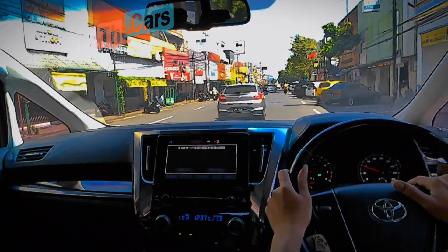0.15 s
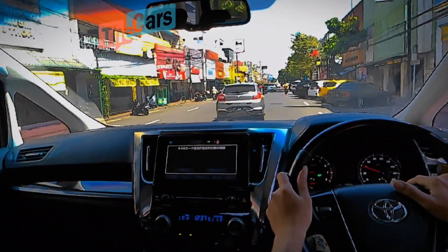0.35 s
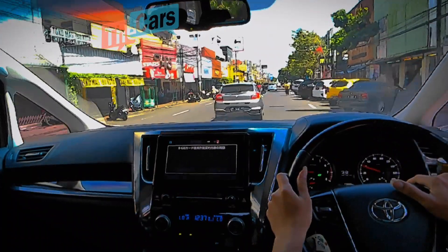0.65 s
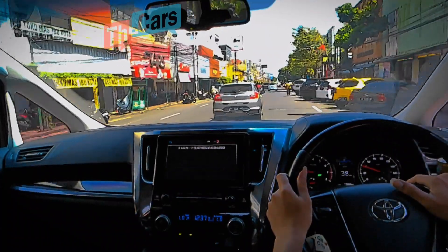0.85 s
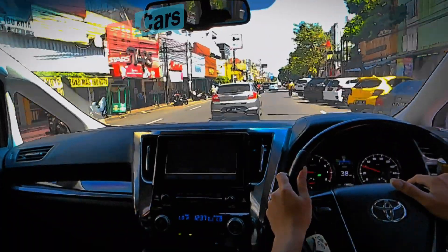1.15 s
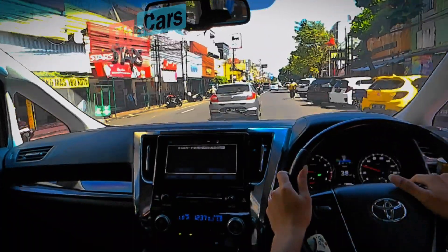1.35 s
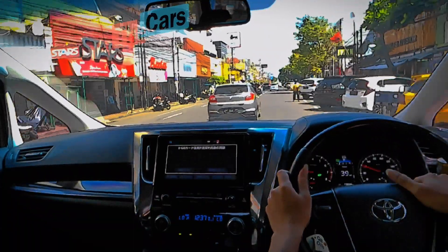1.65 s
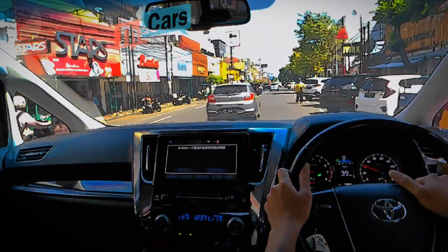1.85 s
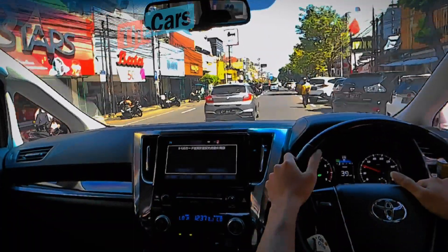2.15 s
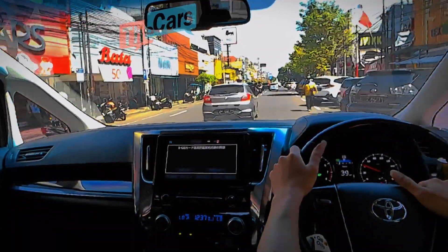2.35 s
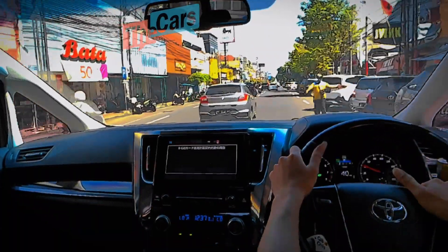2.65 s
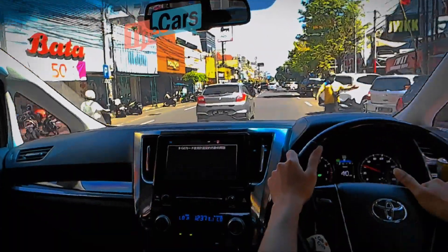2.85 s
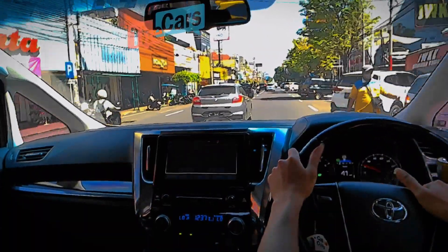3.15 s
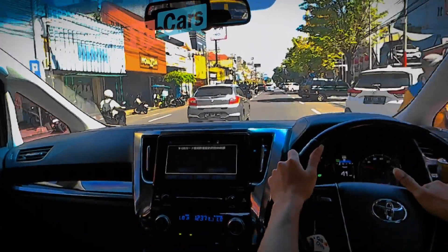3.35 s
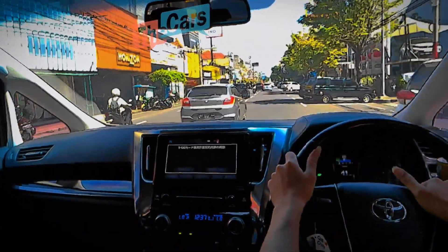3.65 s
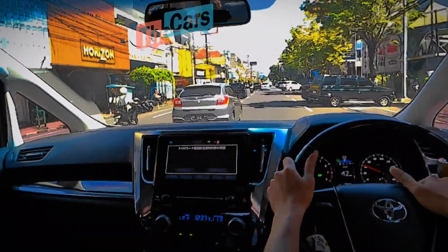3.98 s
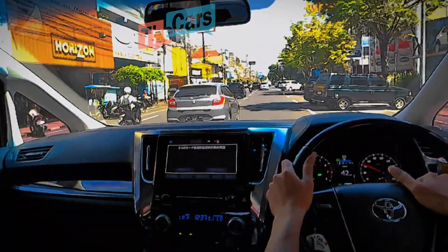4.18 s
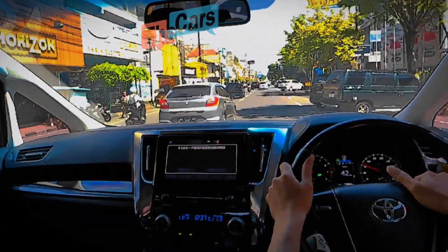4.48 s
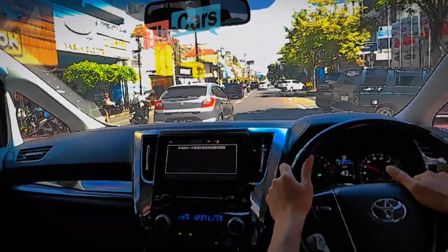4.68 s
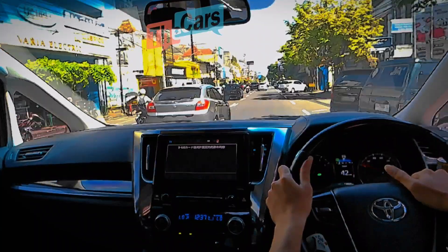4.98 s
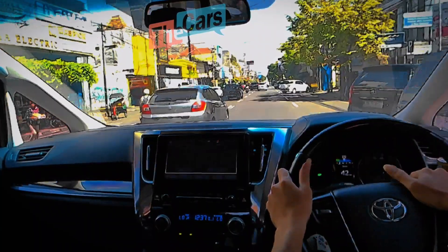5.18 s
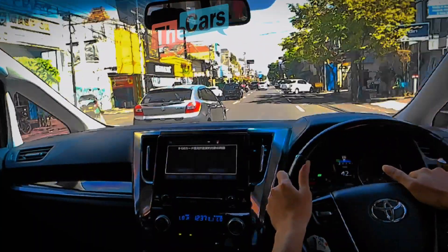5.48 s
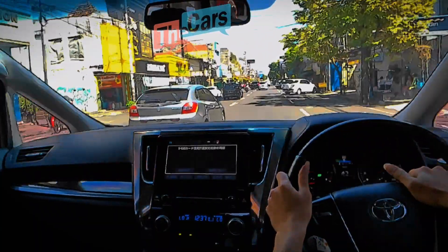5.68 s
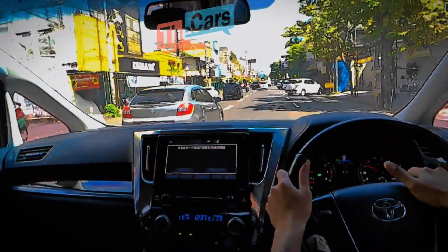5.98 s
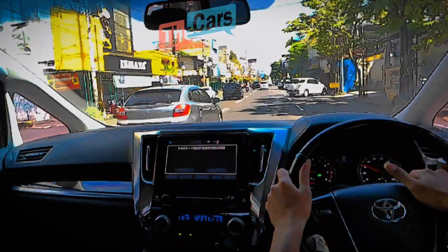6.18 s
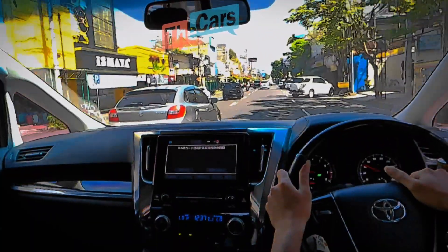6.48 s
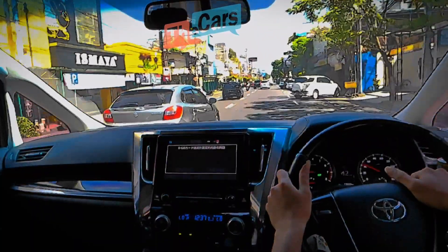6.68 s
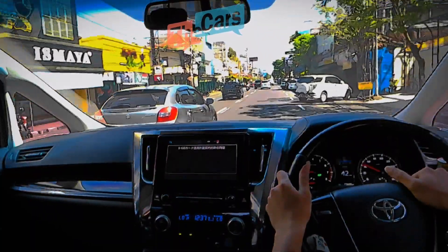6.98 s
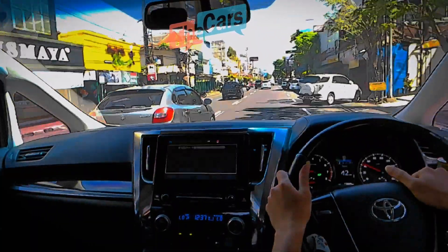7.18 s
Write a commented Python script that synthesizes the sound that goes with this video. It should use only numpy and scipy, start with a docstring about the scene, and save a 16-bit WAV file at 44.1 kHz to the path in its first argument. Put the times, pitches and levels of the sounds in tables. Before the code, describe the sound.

Interior of a car driving steadily along a city street, gaining very little speed, for about 7.3 seconds. A deep, muffled road rumble dominates throughout, mostly below 100 Hz, gently fluctuating, with a weaker low floor drone, soft mid-range tyre roar and barely audible wind. Bumps come irregularly: a busy run of dull heaving thumps from 0.5 to 1.7 s, strong ones near 0.9 and 1.1, another at 2.65, and the heaviest at 3.1 with a floor thud and a boom of cabin air. A small plastic clip snaps lightly at 1.17 s. After a calmer gap from 3.5, a short hollow plastic knock sounds at 4.04 s. More modest thumps follow from 4.1 to 5.5, then lighter floor thuds between 6.3 and 7.2. Door panels and dashboard buzz faintly on bumps; tiny loose-trim ticks are scattered throughout. Faint microphone hiss lies underneath, the sound dark and close.

```python
"""Low boom of tyre and road noise inside a car at city speed: shaped noise for body, cabin air, floor and panels.
Road joints thump: bell-swelled low tones for heave, thuds and booms, bursts of resonances for panels and dashboard.
Tyre roar and wind are shaped noise; loose trim ticks, pings and knocks as damped tones.
Underneath, the microphone hisses faintly as shaped noise."""
import sys
import numpy as np
from scipy import signal
from scipy.fft import rfft, irfft, next_fast_len
from scipy.io import wavfile
from scipy.ndimage import map_coordinates

SR = 44100
rng = np.random.default_rng(int(sys.argv[2]) if len(sys.argv) > 2 else 0)


def put_to_file(sound):
    """Save the sound as 16-bit audio at rate SR, in the file named by the first command-line argument."""
    columns = np.atleast_2d(sound).T  # one column per channel
    safe = np.clip(columns, -1, 1)
    whole_steps = np.round(safe * 32767)
    wavfile.write(sys.argv[1], SR, whole_steps.astype(np.int16))


def decibels_to_gain(level_db):
    """Convert a level in decibels to a linear amplitude gain (20 dB per decade)."""
    exponent = np.asarray(level_db, float) / 20
    return 10 ** exponent


N = 323253

# rolling noise levels over time: (time [s], body boom [dB], cabin air [relative dB], floor drone [relative dB])
ROLLING_LEVELS = [(0.0, -39.5, -51, -54.5), (0.63, -36, -67, -55), (0.86, -34, -55, -52),
                  (1.39, -38, -45.5, -50.5), (1.96, -39, -45.5, -55), (2.18, -37, -43, -50),
                  (2.33, -36, -69, -54.5), (2.51, -38.5, -50, -55), (3.43, -38, -48.5, -55),
                  (3.57, -40, -45.5, -53), (5.49, -38, -48, -53.5), (5.98, -39.5, -52, -52.5),
                  (6.64, -39.5, -43.5, -50), (6.92, -42.5, -46, -51.5), (7.33, -40, -47, -48.5)]
# vehicle speed: (time [s], speed [km/h])
VEHICLE_SPEED = [(0, 37), (2, 38.5), (4.2, 42), (7.33, 42.5)]
# body boom noise: (frequency [Hz], relative density [dB])
BOOM_SPECTRUM = [(3, -28.5), (8, -4), (15, -2.5), (30, -3.5), (42, -7.5), (52, -19), (64, -18), (78, -16),
                 (95, -19.5), (130, -40.5)]
# cabin air resonances: (centre [Hz], width [Hz], relative level [dB])
CABIN_AIR_MODES = [(60.5, 20, -7), (74.7, 6.5, 2)]
# floor drone noise: (frequency [Hz], relative density [dB])
DRONE_SPECTRUM = [(70, -22), (100, -1.5), (125, -1), (160, -3.5), (185, -5), (240, -7.5), (280, -13),
                  (400, -43)]
# tyre cavity resonance: (centre [Hz], width [Hz], relative level [dB])
TYRE_AIR_MODES = [(219.7, 12.5, 0)]
# door panel resonances: (centre [Hz], width [Hz], relative level [dB])
PANEL_MODES = [(325, 40, -6), (380, 30, 0), (440, 35, -11), (520, 50, -12)]
# tyre roar noise: (frequency [Hz], relative density [dB])
ROAR_SPECTRUM = [(400, -20.5), (500, -2), (620, -3.5), (800, 0.5), (1050, -2.5), (1300, -10), (1550, -20),
                 (2000, -30.5), (3500, -37.5)]
# wind noise past the glass: (frequency [Hz], relative density [dB])
WIND_SPECTRUM = [(1000, 8.5), (1600, 3), (2500, -0.5), (5000, -5.5), (10000, -18.5)]
# bumps: (time [s], heave pitch [Hz], heave peak [dB], door panels [relative dB], dashboard [relative dB])
ROAD_BUMPS = [(0.14, 16.5, -26, -47, -73), (0.288, 57, -36, -64, -51), (0.467, 22, -32, -41.5, -48.5),
              (0.503, 40, -38, -64, -56), (0.629, 50, -31, -54, -53), (0.735, 20, -24.5, -45, -49.5),
              (0.889, 23, -21, -47, -48), (0.989, 27, -43, -65, -50), (1.069, 27, -21, -48, -53),
              (1.174, 27, -30, -63, -48.5), (1.246, 17.3, -22, -63, -52.5), (1.358, 14, -45, -43.5, -52),
              (1.376, 12, -31, -40.5, -53), (1.448, 25, -34, -51, -51), (1.561, 16.4, -24, -46.5, -53),
              (1.625, 16.6, -26.5, -47.5, -56), (1.861, 16, -36, -46, -59), (2.109, 29, -32, -44.5, -55),
              (2.347, 11.6, -27, -61, -67), (2.654, 31, -20, -39, -52.5), (2.766, 28.5, -24.5, -44, -69),
              (2.81, 45, -42.5, -50, -71), (2.968, 39, -43, -46, -63), (3.0, 30, -53, -52, -67),
              (3.094, 18.3, -16.5, -45.5, -57), (3.32, 19.6, -20, -48, -59), (3.451, 18, -44, -45.5, -67),
              (4.134, 36, -34, -45.5, -54.5), (4.315, 24.5, -27.5, -49, -52), (4.452, 22, -23.5, -42, -48),
              (4.697, 22, -28.5, -53, -62), (4.805, 9.6, -34, -49, -53), (4.84, 23, -43, -43, -66),
              (4.86, 23, -49, -50, -51), (4.96, 22, -22.5, -64, -60), (5.101, 19, -31, -48, -59),
              (5.162, 28, -48, -43, -72), (5.2, 12.3, -25, -43, -49.5), (5.535, 14, -30.5, -50, -64),
              (5.861, 33, -32, -70, -49), (6.279, 21, -29.5, -58, -53), (6.381, 19, -47, -45.5, -54),
              (6.538, 30, -45, -54, -52.5), (6.609, 22, -33, -62, -52), (6.835, 40, -43, -45.5, -64),
              (7.004, 30, -32.5, -57, -51.5), (7.171, 28, -34.5, -46, -58)]
# floor pan thuds: (time [s], pitch [Hz], peak [dB])
FLOOR_THUDS = [(0.138, 153, -42), (0.635, 162, -39.5), (0.728, 149, -39), (0.896, 145, -40.5),
               (0.965, 143, -43), (1.065, 169, -43), (1.237, 142, -39.5), (2.093, 141, -43),
               (2.346, 158, -40), (2.651, 161.5, -37.4), (3.093, 147.7, -36.0), (3.331, 140, -41.5),
               (4.45, 155, -37.5), (4.774, 129, -39.5), (5.196, 146, -42), (5.505, 135, -40.5),
               (6.454, 125, -40), (6.561, 148, -44), (6.627, 150, -44), (6.721, 138, -41.5),
               (6.776, 136, -41.5), (6.844, 146, -46)]
# cabin air booms: (time [s], pitch [Hz], peak [dB])
CABIN_BOOMS = [(0.735, 65, -37), (0.913, 76, -30), (1.074, 68.6, -35.5), (1.189, 68, -36),
               (2.653, 66, -36.5), (3.104, 71, -33), (3.893, 71.5, -34), (4.179, 70.6, -32.5),
               (4.484, 67, -34), (4.952, 72.4, -32.5), (5.08, 69.6, -40), (5.472, 73.4, -43),
               (6.447, 77, -34), (6.737, 74, -33.5)]
# dashboard resonances: (centre [Hz], width [Hz], relative level [dB])
DASH_MODES = [(445, 14, -6), (532, 38, -7.5), (615, 76, -3), (708, 61, -1), (879, 62, -3), (1055, 71, -3),
              (1233, 106, -10.5), (1400, 80, -15)]
# floor resonances: (centre [Hz], width [Hz], relative level [dB])
FLOOR_MODES = [(122, 20, -5), (150, 22, 0), (170, 20, -4)]
# hollow plastic knock, contacts: (time [s], relative level [dB])
KNOCK_HITS = [(4.0428, -36.5), (4.0457, -40), (4.0493, -42)]
# hollow plastic modes: (frequency [Hz], relative level [dB], t60 [s])
KNOCK_MODES = [(610, 4, 0.06), (780, 2, 0.045), (900, -1, 0.022), (1030, 1, 0.022), (1085, 4, 0.03),
               (1265, 1, 0.016), (1360, -1, 0.016), (1480, -8, 0.018), (1670, -17, 0.027),
               (1850, -17, 0.027), (2000, -11, 0.04), (2070, -5, 0.056), (2540, -21, .025),
               (2940, -29, .025)]
# small clip snapping, contacts: (time [s], relative level [dB])
PING_HITS = [(1.1745, -60), (1.1775, -42.5), (1.245, -64), (1.365, -61)]
# small clip modes: (frequency [Hz], relative level [dB], t60 [s])
CLIP_MODES = [(1771, -16, .014), (1981, -4, .016), (2200, 1, .018), (2412, -3, .018), (2930, -5, .028),
              (3440, -14, .12), (3709, -5, .016), (4312, -3, .015), (4600, -7, .014), (4950, -7, .014),
              (5300, -8, .012), (5950, -11, .012), (7000, -19, .01), (8300, -18, .01)]
# loose trim ticks: (time [s], relative level [dB], centre [Hz], spread [octaves])
TRIM_TICKS = [(.28, -72, 1560, 0.08), (.28, -75, 3600, 0.08), (.42, -76, 4200, 0.22),
              (.526, -72, 1580, 0.08), (.527, -76, 3500, 0.15), (.735, -75, 3100, 0.15),
              (1.143, -75, 2400, 0.1), (1.146, -74, 4800, 0.12), (1.155, -71, 2550, 0.1),
              (1.16, -75, 4000, 0.5), (1.165, -63, 2700, 0.4), (1.241, -72, 2600, 0.2),
              (2.645, -72, 2000, 0.5), (4.0425, -60, 1300, 0.2), (4.581, -72, 1890, 0.36),
              (4.815, -72, 2500, 0.55), (4.97, -70, 2030, 0.18), (5.168, -68, 2300, 0.17),
              (5.169, -70, 4670, 0.1), (6.505, -73, 1630, 0.05)]
# microphone hiss: (frequency [Hz], relative density [dB])
HISS_SPECTRUM = [(300, 10), (2000, -7.5), (5000, -1.5), (10800, -1), (11300, -4.5), (16000, -4)]


def unit(x):
    """Scaled to rms 1."""
    return x / np.sqrt(np.mean(x ** 2) + 1e-20)


def wobble(knots_per_s):
    """Smooth random curve through normal-distributed knots."""
    knots = rng.standard_normal(int(N * knots_per_s / SR) + 4)
    return map_coordinates(knots, [np.arange(N) * knots_per_s / SR])


def coloured(response):
    """White noise through a response of frequency, rms 1."""
    m = next_fast_len(N)
    hz = np.fft.rfftfreq(m, 1 / SR)
    white = rfft(rng.standard_normal(m))
    return unit(irfft(white * response(hz), m)[:N])


def spectrum(points):
    """Gain through (Hz, dB) points on a log axis, closed at both ends."""
    f, db = np.transpose(points)
    return lambda hz: decibels_to_gain(np.interp(np.log(hz + 1), np.log(f + 1), db, -120, -120))


def resonant(modes):
    """Summed gain of resonances, each halved one width off centre."""
    return lambda hz: sum(decibels_to_gain(db) / (1 + ((hz - c) / w) ** 2) for c, w, db in modes)


def swells(rows, width_s):
    """One tone per row, random phase, under a bell-shaped swell."""
    out, t = np.zeros(N + SR), np.arange(-SR // 10, SR // 10) / SR
    bell = np.exp(-(t / width_s) ** 2 / 2)
    for (s, hz, db), turn in zip(rows, rng.random(len(rows))):
        tone = np.cos(2 * np.pi * (hz * t + turn))
        out[round(s * SR):][:len(t)] += decibels_to_gain(db) * bell * tone
    return out[SR // 10:][:N]


def packets(times_s, levels_db, modes, width_s, scatter_db):
    """Each shake sounds the modes, randomly detuned, under a bell-shaped swell."""
    out, t = np.zeros(N + SR), np.arange(-SR // 10, SR // 10) / SR
    bell = np.exp(-(t / width_s) ** 2 / 2)
    hz, width_hz, level_db = np.transpose(modes)[:, :, None]
    draws = rng.standard_normal((len(times_s), 3, len(modes), 1))
    for s, db, (strength, detune, phase) in zip(times_s, levels_db, draws):
        tones = np.sin(2 * np.pi * (hz + 0.473 * width_hz * detune) * t + 3 * phase)
        burst = unit((decibels_to_gain(level_db + scatter_db * strength) * tones).sum(axis=0)) / np.sqrt(2)
        out[round(s * SR):][:len(t)] += decibels_to_gain(db) * burst * bell
    return out[SR // 10:][:N]


def struck(hits, modes, scatter_db, gain_db, attack_s):
    """Each hit rings decaying modes at slightly new strengths and phases."""
    out, t = np.zeros(N + SR), np.arange(SR // 5) / SR
    onset = 1 - np.exp(-t / attack_s)
    hz, level_db, t60_s = np.transpose(modes)[:, :, None]
    draws = rng.standard_normal((len(hits), 2, len(modes), 1))
    for (s, db), (strength, phase) in zip(hits, draws):
        decay = decibels_to_gain(level_db + scatter_db * strength - 60 * t / t60_s)
        ring = decay * np.sin(2 * np.pi * hz * t + 0.25 * phase)
        out[round(s * SR):][:len(t)] += decibels_to_gain(db + gain_db) * ring.sum(axis=0) * onset
    return out[:N]


def ticks(rows, t60_s, smear_s):
    """24 tiny contacts within milliseconds, each a damped tone, the high ones weaker."""
    out, t = np.zeros(N + SR), np.arange(SR // 12) / SR
    draws = rng.standard_normal((len(rows), 2, 24, 1))
    for (s, db, hz, octaves), (pitch, delay) in zip(rows, draws):
        late = np.maximum(t - smear_s * abs(delay), 0)
        rise = octaves * pitch
        decay_s = t60_s * (1 + 0.043 / octaves)  # narrow ticks ring longer
        tones = np.sin(2 * np.pi * hz * 2 ** rise * late) * decibels_to_gain(-4 * rise - 60 * late / decay_s)
        out[round(s * SR):][:len(t)] += decibels_to_gain(db - 4.5) * tones.sum(axis=0)
    return out[:N]


def rolling_db(column):
    """One column of the rolling noise levels, interpolated over time."""
    rows = np.transpose(ROLLING_LEVELS)
    return np.interp(np.arange(N) / SR, rows[0], rows[column])


def body_boom(shake):
    """Tyre and road noise booms through the body: low shaped noise."""
    level_db = rolling_db(1) + 1.13 * shake + 1.64 * wobble(16)
    return decibels_to_gain(level_db) * coloured(spectrum(BOOM_SPECTRUM))


def cabin_air(shake):
    """Low cabin air rumble of wandering level: noise through its resonances."""
    level_db = rolling_db(2) - 3.0 + 1.6 * shake + 1.2 * wobble(11)
    return decibels_to_gain(level_db) * coloured(resonant(CABIN_AIR_MODES))


def floor_drone(shake):
    """Floor noise plus the weaker resonance of the air in the tyres."""
    level_db = rolling_db(3) + 0.4 + 1.75 * shake + 2.2 * wobble(24)
    floor = coloured(spectrum(DRONE_SPECTRUM))
    tyre_air = decibels_to_gain(-11.0) * coloured(resonant(TYRE_AIR_MODES))
    return decibels_to_gain(level_db) * (floor + tyre_air)


def panel_hum(shake):
    """Door panels hum: noise through their resonances."""
    level_db = -56.5 + 1.0 * shake + 1.2 * wobble(18)
    return decibels_to_gain(level_db) * coloured(resonant(PANEL_MODES))


def tyre_roar(shake):
    """Tyres roar: mid-band shaped noise."""
    level_db = -63.5 + 1.1 * shake + 0.9 * wobble(14) + 0.4 * wobble(3)
    return decibels_to_gain(level_db) * coloured(spectrum(ROAR_SPECTRUM))


def wind(shake):
    """Air past the glass; pressure grows as a power of speed."""
    pressure_power = 2.4
    speed = np.interp(np.arange(N) / SR, *np.transpose(VEHICLE_SPEED))
    faster = speed / VEHICLE_SPEED[0][1]
    start_db = -73.5 + 0.49 * shake + 1.16 * wobble(13)
    return decibels_to_gain(start_db) * faster ** pressure_power * coloured(spectrum(WIND_SPECTRUM))


def road():
    """Steady rolling noise; a shared shake makes all layers swell together."""
    shake = wobble(9)
    low = body_boom(shake) + cabin_air(shake) + floor_drone(shake)
    return low + panel_hum(shake) + tyre_roar(shake) + wind(shake)


def body_heave():
    """Body heaves once or twice per bump: a low tone under a bell scaled to its period."""
    t, heave = np.arange(N) / SR, np.zeros(N)
    for (s, hz, db, _, _), turn in zip(ROAD_BUMPS, rng.random(len(ROAD_BUMPS))):
        bell = np.exp(-((t - s) * hz / 0.4) ** 2)
        heave += decibels_to_gain(db) * bell * np.cos(2 * np.pi * (hz * (t - s) + turn))
    return heave


def floor_and_air_thuds():
    """Floor pan thuds and cabin air booms as short swelled tones."""
    return swells(FLOOR_THUDS, width_s=0.011) + swells(CABIN_BOOMS, width_s=0.0092)


def panel_bursts():
    """Bumps shake the door panels into short bursts of their resonances."""
    s, _, _, panel_db, _ = np.transpose(ROAD_BUMPS)
    return packets(s, panel_db, PANEL_MODES, width_s=0.011, scatter_db=2)


def dashboard_buzz():
    """Bumps make the dashboard buzz: swells of dull resonant noise."""
    swell_s, top_hz, gain_db = 0.0096, 1120, -4.5
    t = np.arange(N) / SR
    s, _, _, _, dash_db = np.transpose(ROAD_BUMPS)
    swell = sum(decibels_to_gain(db) * np.exp(-((t - at) / swell_s) ** 2 / 2) for at, db in zip(s, dash_db))
    dull = lambda hz: resonant(DASH_MODES)(hz) / (1 + (hz / top_hz) ** 2)
    return decibels_to_gain(gain_db) * swell * coloured(dull)


def pebbles(count, modes, base_db, width_s):
    """Small unevennesses at random times, a few much stronger than the rest."""
    draw = rng.random((count, 2))
    levels_db = base_db - 3.34 * np.log(draw[:, 1] + 0.05)
    return packets(draw[:, 0] * N / SR, levels_db, modes, width_s, scatter_db=5)


def bumps():
    """Listed bumps, thuds and booms, plus random small unevennesses."""
    large = body_heave() + floor_and_air_thuds() + panel_bursts() + dashboard_buzz()
    floor = pebbles(count=80, modes=FLOOR_MODES, base_db=-56.5, width_s=0.031)
    dash = pebbles(count=200, modes=DASH_MODES, base_db=-62.0, width_s=0.0054)
    panels = pebbles(count=60, modes=PANEL_MODES, base_db=-57.5, width_s=0.011)
    return large + floor + dash + panels


def plastic_knock():
    """Hollow plastic knocks in three close contacts, ringing its modes."""
    return struck(KNOCK_HITS, KNOCK_MODES, scatter_db=1.5, gain_db=-10, attack_s=0.00037)


def clip_ping():
    """A small clip snaps and rings on."""
    return struck(PING_HITS, CLIP_MODES, scatter_db=2, gain_db=-4, attack_s=0.0006)


def trim_ticks():
    """Loose plastic ticks: listed ones over 40 faint ones at random times."""
    at, level, pitch = rng.random((3, 40))
    spread_octaves = np.full(40, 0.37)
    faint = np.transpose([at * N / SR, -83 + 5 * level, 2200 * 3.5 ** pitch, spread_octaves])
    return ticks(TRIM_TICKS, t60_s=0.029, smear_s=0.004) + ticks(faint, t60_s=0.05, smear_s=0.005)


def microphone_hiss():
    """Microphone self-noise: shaped noise of slightly unsteady level."""
    return decibels_to_gain(-72.5 + 0.17 * wobble(3.9)) * coloured(spectrum(HISS_SPECTRUM))


def band_limit(x):
    """Removes everything from the top frequency up."""
    top_hz = 15750
    m = next_fast_len(N + SR // 4)
    passed = np.fft.rfftfreq(m, 1 / SR) < top_hz
    return irfft(rfft(x, m) * passed, m)[:, :N]


def scene():
    """Everything heard at the driver's seat, one channel."""
    return (road() + bumps() + plastic_knock() + clip_ping() + trim_ticks())[None]


def roll_off(x):
    """The treble ends steeply here."""
    return signal.sosfilt(signal.butter(12, 16020, fs=SR, output="sos"), x)


def record(dry):
    """Adds microphone hiss and limits the band."""
    heard = band_limit(dry + microphone_hiss())
    return roll_off(heard)


dry = scene()
out = record(dry)
put_to_file(out)
```